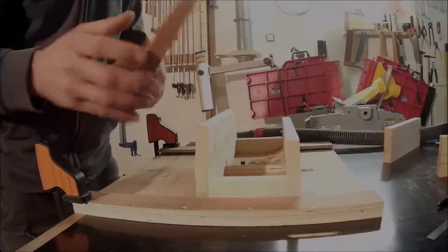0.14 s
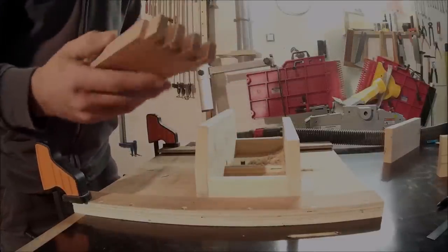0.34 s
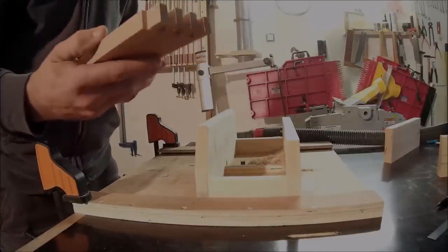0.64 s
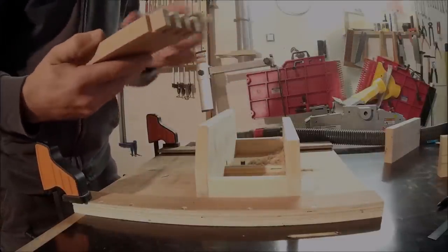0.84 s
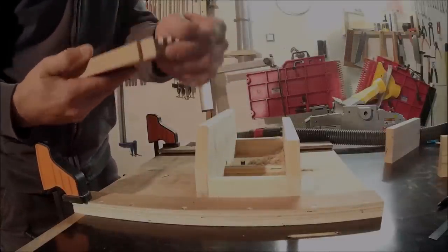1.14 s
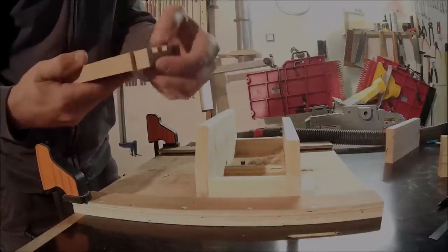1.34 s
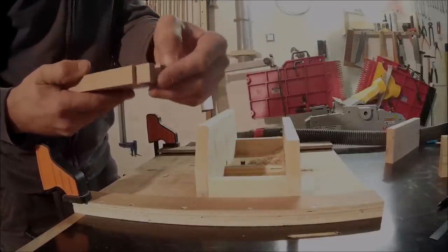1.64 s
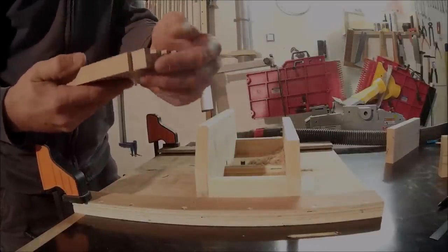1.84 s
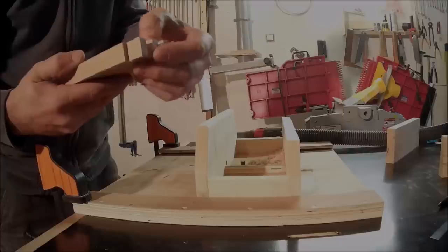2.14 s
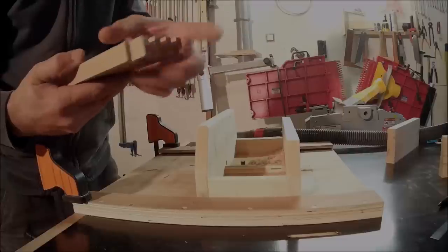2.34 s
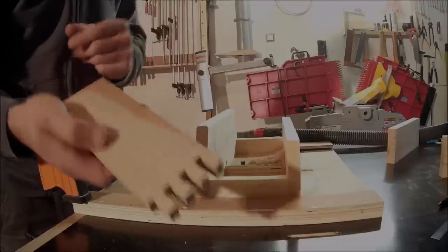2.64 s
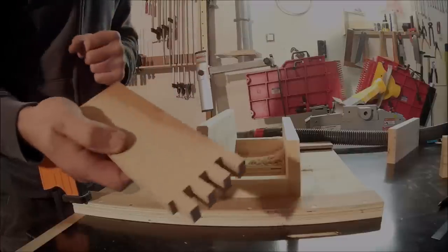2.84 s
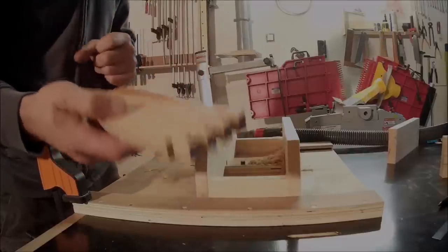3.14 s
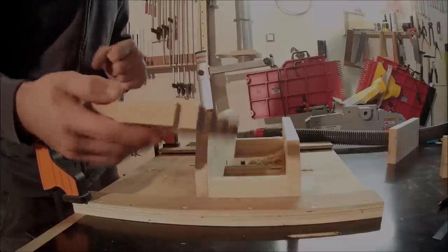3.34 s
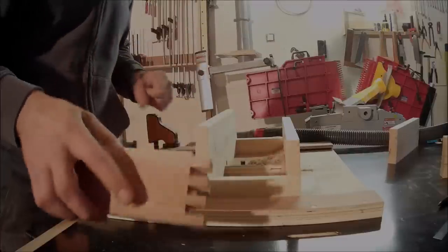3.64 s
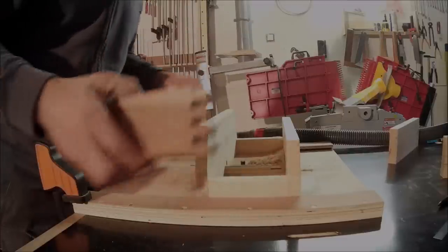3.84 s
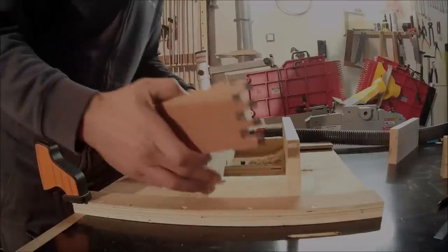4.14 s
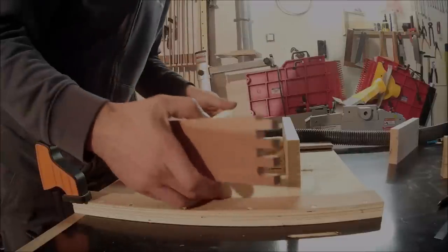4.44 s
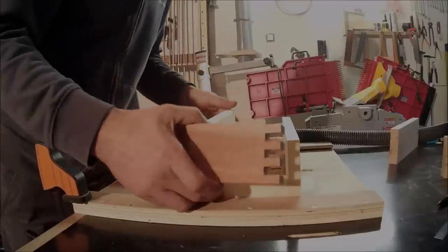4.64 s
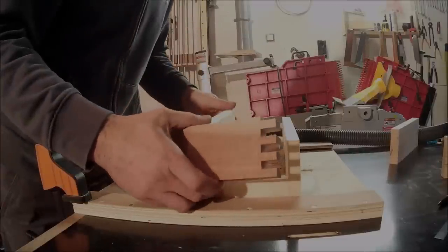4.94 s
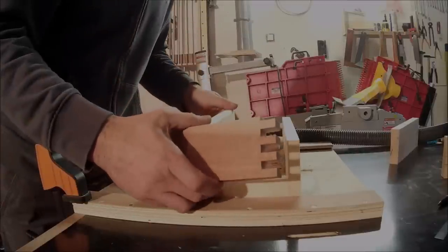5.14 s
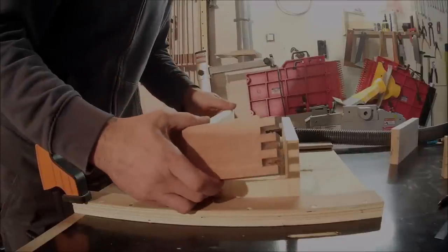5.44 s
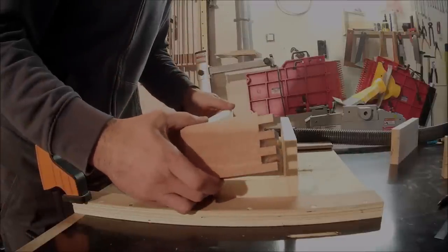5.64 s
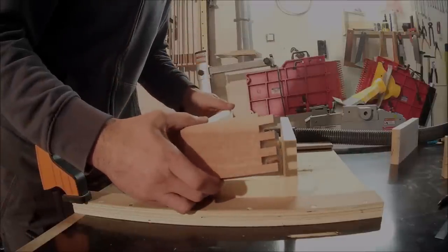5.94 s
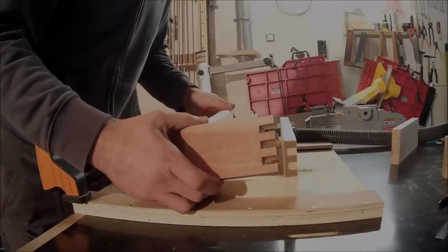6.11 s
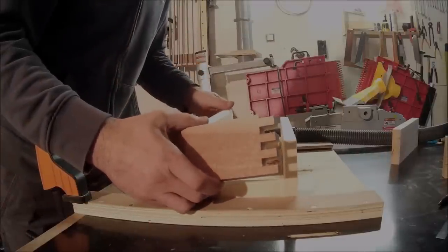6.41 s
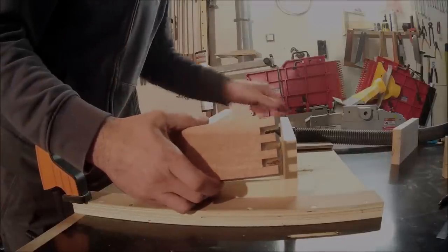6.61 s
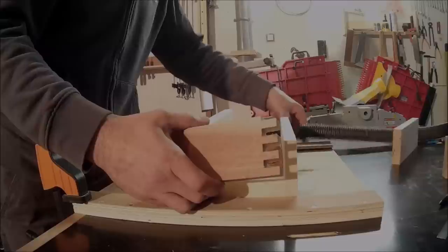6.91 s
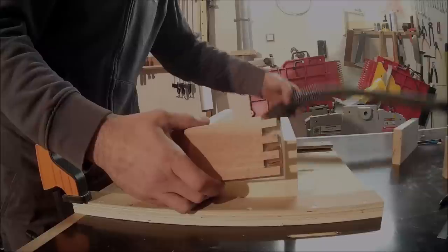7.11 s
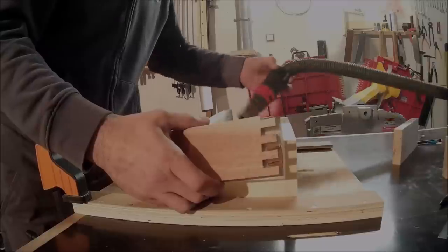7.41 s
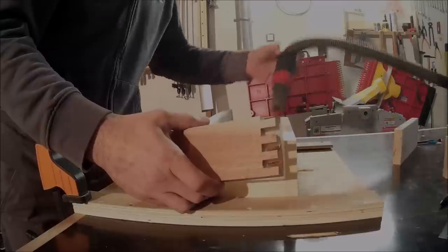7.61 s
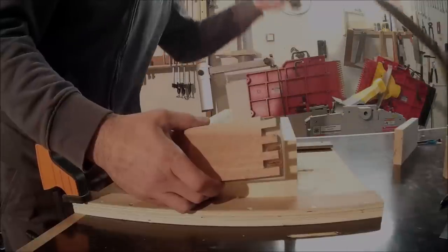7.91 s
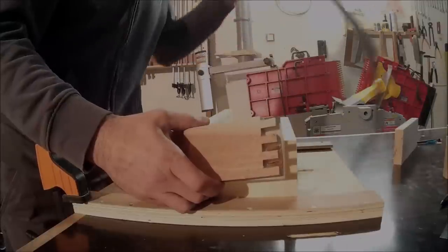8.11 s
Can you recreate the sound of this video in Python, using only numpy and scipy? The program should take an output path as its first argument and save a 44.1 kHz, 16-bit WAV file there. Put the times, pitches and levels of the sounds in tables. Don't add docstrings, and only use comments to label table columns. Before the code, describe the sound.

A small motor hums steadily on one mid pitch over faint hiss, its high thin whine flaring briefly under load before easing back.

```python
import sys
import numpy as np
from scipy import signal
from scipy.fft import rfft, irfft, dct, next_fast_len
from scipy.io import wavfile
from scipy.ndimage import uniform_filter1d

SR = 44100
rng = np.random.default_rng(int(sys.argv[2]) if len(sys.argv) > 2 else 0)


def digitize_waveform(pressure):
    field = np.atleast_2d(pressure).T
    bounded = np.clip(field, -1, 1)
    quanta = np.round(bounded * 32767).astype(np.int16)
    wavfile.write(sys.argv[1], SR, quanta)


def undo_db(level):
    steps = np.asarray(level, float) / 20
    return 10 ** steps


N = 364707


def evened(x):
    return x / np.sqrt(np.mean(x ** 2) + 1e-30)


def add(mix, s, sound):
    part = mix[round(s * SR) - len(sound) // 2:][:len(sound)]
    part += sound[:len(part)]


def wander(rate_hz):
    t = np.arange(0, N + 256, 256) / SR
    rates = np.geomspace(rate_hz / 20, rate_hz, 16)
    slow = sum(np.sin(2 * np.pi * (hz * t + rng.random())) for hz in rates)
    return np.interp(np.arange(N) / SR, t, evened(slow))


def motor():
    # time in seconds, level in dB.
    hum_levels = [
        (0.0, -50.5),
        (3.89, -50.5),
        (5.02, -49.5),
        (6.42, -49.5),
        (7.76, -50.5),
        (8.04, -49.5),
        (8.27, -50),
    ]
    # multiple of the speed, level in dB idling, under load
    motor_orders = [(2, -72, -78, -72), (3, -71, -70, -69), (4, -79, -77, -79), (5, -89, -75, -83),
                    (6, -77, -72, -75), (7, -90, -81, -88), (8, -87, -77, -82), (9, -94, -75, -84),
                    (10, -89, -77, -89), (11, -88, -78, -81), (12, -78, -84, -86), (13, -87, -86, -89),
                    (14, -90, -94, -100), (15, -90, -78, -100), (16, -86, -76, -75), (17, -87, -75, -79),
                    (18, -72, -70, -74), (19, -80, -68, -75), (20, -69, -61, -66), (21, -67, -63, -64),
                    (22, -70, -60, -78), (23, -73, -59, -66), (24, -77, -70, -71), (25, -90, -71, -75),
                    (26, -83, -64, -80), (27, -81, -63, -83), (28, -84, -66, -89), (29, -87, -68, -87),
                    (30, -80, -68, -85), (31, -86, -71, -90), (32, -87, -78, -92), (33, -90, -80, -97),
                    (34, -96, -86, -99)]
    motor_hz = 427.48
    flutter_db, flutter_hz = 1.5, 3.0
    ring_hz, ring_width_hz = 9400, 450
    tick_at = .56
    smear, tighten = 1.15, .85

    t = np.arange(N) / SR
    turns = np.cumsum(motor_hz + hunting(t)) / SR
    load = loading(t)
    settled = np.interp(t, [4.1, 6.7], [0, 1])
    hum_db = np.interp(t, *np.transpose(hum_levels))
    out = np.sqrt(2) * undo_db(hum_db) * np.sin(2 * np.pi * turns)
    throb = 1 + 0.047 * np.sin(2 * np.pi * 171.3 * t)
    for k, idle_db, load_db, settled_db in motor_orders:
        rest_db = idle_db + settled * (settled_db - idle_db)
        lift_db = load * (load_db + 0.0716 * k - rest_db)
        flutter = (1 - load / 2) * flutter_db * wander(flutter_hz)
        level = undo_db(rest_db + lift_db + flutter)
        loose = smear * (1 - tighten * load) * (rng.random() - .5)
        lag = 2 * np.arctan((k * motor_hz - ring_hz) / ring_width_hz)
        phase = 2 * np.pi * (round(k) * (turns - tick_at) + loose) - lag
        out -= np.sqrt(2) * level * np.cos(phase) * throb
    return out


def hunting(t):
    # time of the jolt in seconds, pitch swing in Hz.
    jolts = [(0.21, 0.22), (0.57, -0.25), (1.15, 0.3), (1.42, 0.25), (1.9, 0.36), (2.11, -0.39),
             (2.76, 0.45), (3.94, 0.29), (4.33, -0.29), (5.24, 0.34), (5.43, -0.5), (5.88, -0.35),
             (6.22, -0.27), (7.34, -0.2)]
    swing_rate_hz, dies_s = 3.0, 1.3
    total = np.zeros(len(t))
    for s, swing_hz in jolts:
        since = np.maximum(t - s, 0)
        total += swing_hz * np.sin(2 * np.pi * swing_rate_hz * since) * np.exp(-since / dies_s)
    return total


def loading(t):
    on_s, off_s, bite_s, sag = 5.39, 5.825, .11, .08
    let_go_s, tail_s, tail_share = 0.077, .6, .5
    bite = np.clip((t - on_s) / bite_s, 0, 1)
    held = 1 - sag * np.clip((t - on_s) / (off_s - on_s), 0, 1) ** 2
    after = np.maximum(t - off_s, 0)
    release = (1 - tail_share) * np.exp(-after / let_go_s) + tail_share * np.exp(-after / tail_s)
    return np.clip(bite * held * release, 0, 1)


def electrical_tones():
    # pitch in Hz, level in dB, wavering in dB.
    thin_tones = [
        (50, -92, .5),
        (100, -103, 1),
        (11380, -88, 2),
        (1537.7, -76, 2),
        (1965.2, -81, 2),
        (2392.7, -87, 2),
        (2820.2, -87, 2),
        (3338, -88, 2),
    ]
    t = np.arange(N) / SR
    out = np.zeros(N)
    for hz, db, sway_db in thin_tones:
        level = undo_db(db + sway_db * wander(5.0))
        out += np.sqrt(2) * level * np.sin(2 * np.pi * (hz * t + rng.random()))
    return out


def room_and_hiss():
    # pitch in Hz, level in dB per Hz.
    room_curve = [(30, -28), (62, -16.5), (95, -25), (125, -19), (150, -2), (260, -9), (400, -8.5),
                  (600, -4.5), (1000, 0), (1500, -6), (2200, -8), (3200, -11), (4700, -10.5), (5200, -7)]
    hiss_curve = [(5200, -7), (6300, -6.5), (7500, -2.5), (8500, -0.5), (9300, 1.5), (10200, -3.5),
                  (11500, -7.5), (13000, -13), (14500, -17.5), (15000, -25), (15700, -25)]
    # pitch in Hz, width in Hz, level in dB.
    room_peaks = [
        (211.8, 18, -80),
        (634.4, 33, -77.5),
        (1059, 23, -79),
    ]
    size = next_fast_len(N)
    hz = np.fft.rfftfreq(size, 1 / SR)
    curve_hz, curve_db = np.transpose([*room_curve, *hiss_curve[1:]])
    white = rfft(rng.standard_normal((1 + len(room_peaks), size)))
    shape = undo_db(np.interp(np.log(hz + 1), np.log(curve_hz), curve_db))
    out = undo_db(-57) * evened(irfft(white[0] * shape, size))
    for noise, (peak_hz, width_hz, db) in zip(white[1:], room_peaks):
        peak = 1 / (1 + (2 * (hz - peak_hz) / width_hz) ** 2)
        out += undo_db(db) * evened(irfft(noise * peak, size))
    return out[:N]


def dropouts(x):
    # time in seconds, how far in dB a tone must rise above its neighbours to survive.
    thin_moments = [(.583, 15), (.626, 13), (1.693, 13), (1.905, 14), (2.951, 12), (3.037, 12), (3.08, 13),
                    (3.676, 16), (3.975, 13), (4.039, 12), (4.123, 13), (5.361, 15)]
    size = 1700
    low_hz, left, band_db = 1500.0, .08, 2.5
    out = x.copy()
    window = signal.windows.hann(size) ** .5
    hz = np.arange(size) * SR / 2 / size
    spared_db = 14.0 * np.exp(-((hz - 8700.0) / 1500.0) ** 2)
    lucks = rng.standard_normal((len(thin_moments), size // 32 + 1))
    for (s, keep_db), luck in zip(thin_moments, lucks):
        lines = dct(x[round(s * SR) - size // 2:][:size] * window, 4, norm="ortho")
        local = np.exp(uniform_filter1d(np.log(abs(lines) + 1e-12), 48))
        bar_db = keep_db - spared_db + band_db * np.repeat(luck, 32)[:size]
        weak = (abs(lines) < undo_db(bar_db) * local) & (hz > low_hz)
        lost = dct(lines * weak, 4, norm="ortho") * window
        add(out, s, -(1 - left) * lost)
    return out


def strays():
    # time in seconds, centre of the band in Hz, level in dB.
    stray_bursts = [(0.56, 5300, -72), (0.952, 4950, -75), (1.254, 8270, -67), (2.191, 5730, -76),
                    (2.534, 5170, -74), (2.534, 14900, -87), (2.786, 5730, -72), (3.773, 5760, -73),
                    (4.998, 6300, -71), (4.998, 12400, -75), (5.268, 14600, -82), (5.416, 5700, -74),
                    (5.7, 5750, -75), (6.04, 14430, -83), (6.415, 14800, -86), (6.58, 6270, -74),
                    (6.58, 14500, -82), (6.969, 6900, -70), (6.969, 13100, -78), (7.184, 13800, -77),
                    (7.695, 5200, -75), (7.695, 13400, -79), (7.732, 6400, -69), (8.112, 6100, -71),
                    (8.15, 14450, -80)]
    size, grid, width_hz = 1024, 169, 1400
    out = np.zeros(N)
    lines = np.arange(size) + .5
    places = np.arange(2 * size) + .5 + size / 2
    window = signal.windows.cosine(2 * size)
    noises = rng.standard_normal((len(stray_bursts), size))
    for (s, centre_hz, db), noise in zip(stray_bursts, noises):
        band = abs(lines * SR / 2 / size - centre_hz) < width_hz / 2
        burst = noise[band] @ np.cos(np.pi / size * np.outer(lines[band], places))
        s = (grid + round((s * SR - grid) / size) * size) / SR
        add(out, s, undo_db(db) * evened(burst) * window)
    return out


def scene():
    return np.tile(motor() + electrical_tones() + room_and_hiss(), (2, 1))


def band_limit(x):
    return signal.sosfilt(signal.butter(12, 15680, fs=SR, output="sos"), x)


def record(dry):
    mono = dropouts(dry[0])
    side = strays()
    return band_limit(np.array([mono + side, mono - side]))


dry = scene()
out = record(dry)
digitize_waveform(out)
```